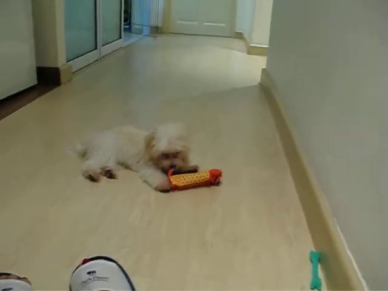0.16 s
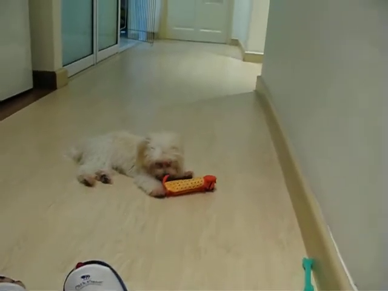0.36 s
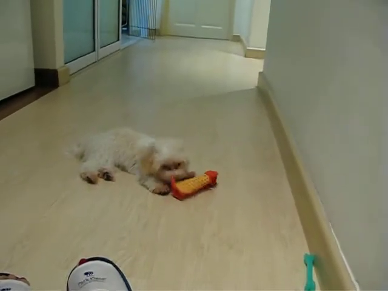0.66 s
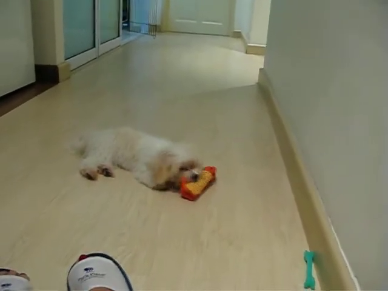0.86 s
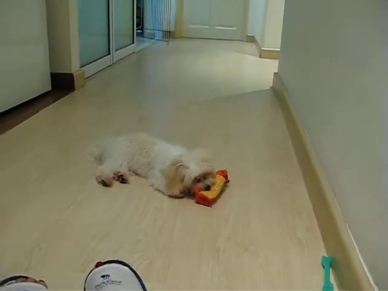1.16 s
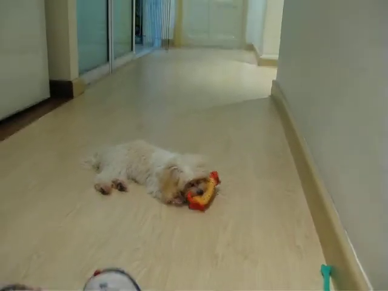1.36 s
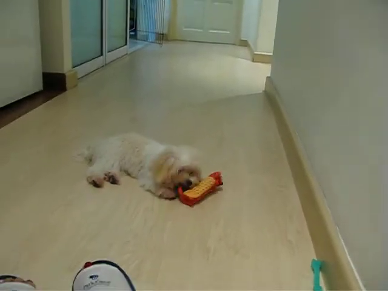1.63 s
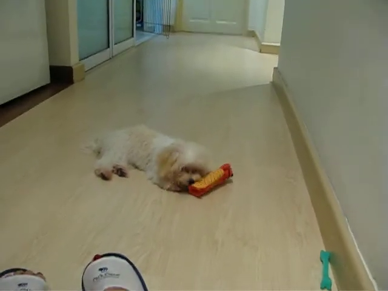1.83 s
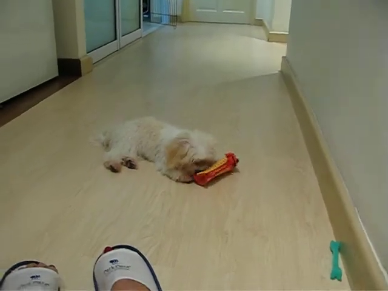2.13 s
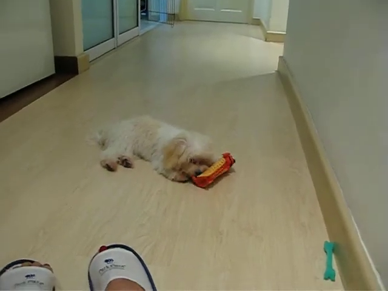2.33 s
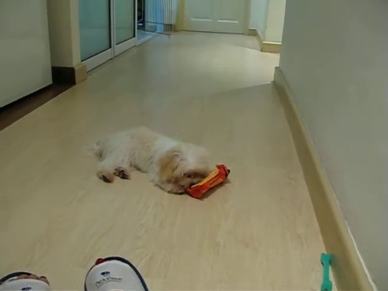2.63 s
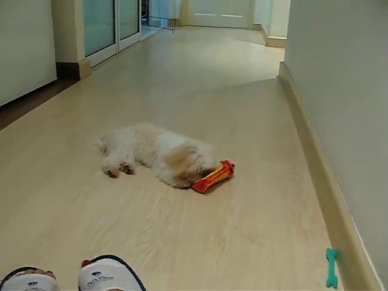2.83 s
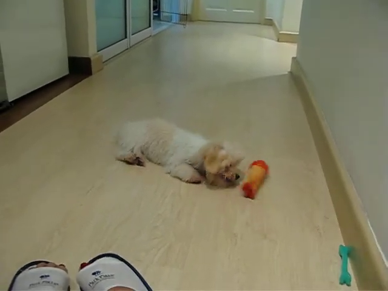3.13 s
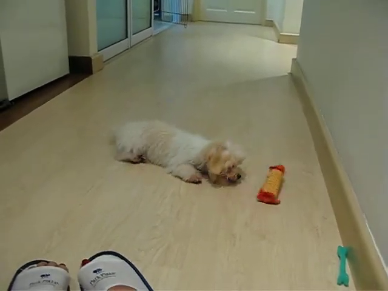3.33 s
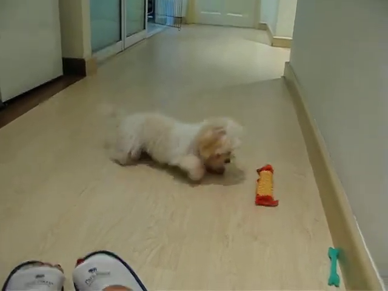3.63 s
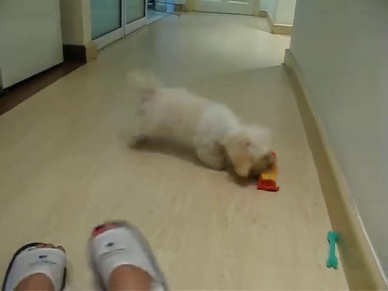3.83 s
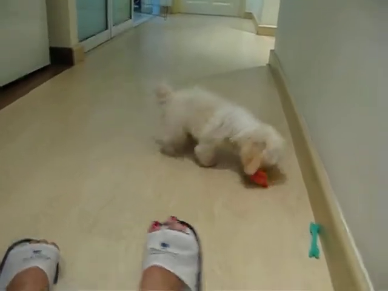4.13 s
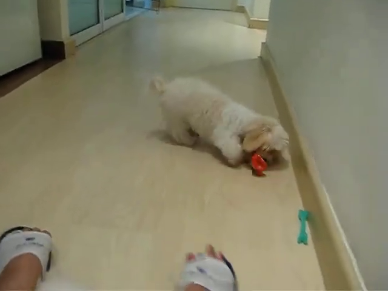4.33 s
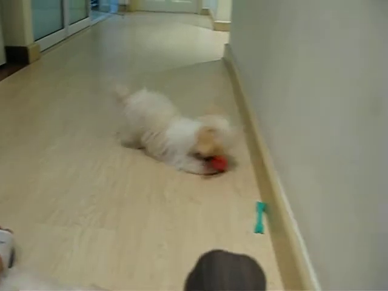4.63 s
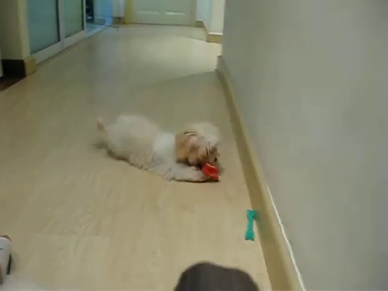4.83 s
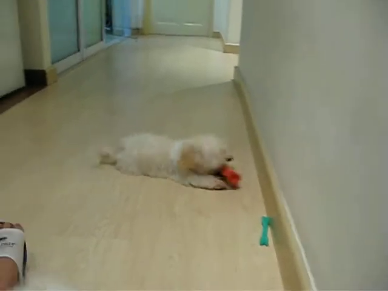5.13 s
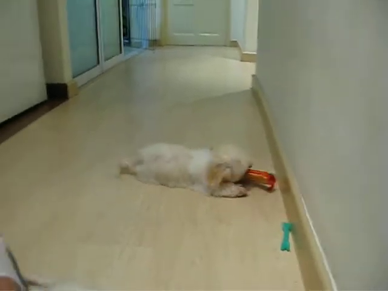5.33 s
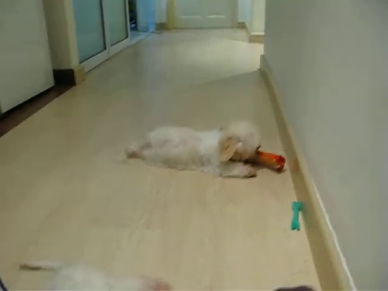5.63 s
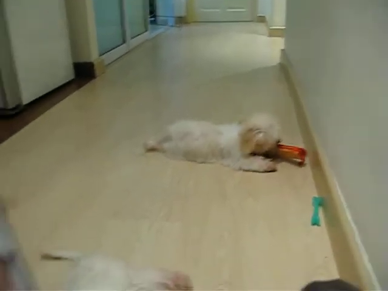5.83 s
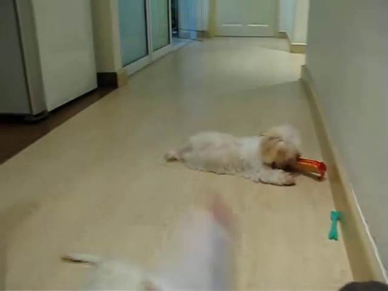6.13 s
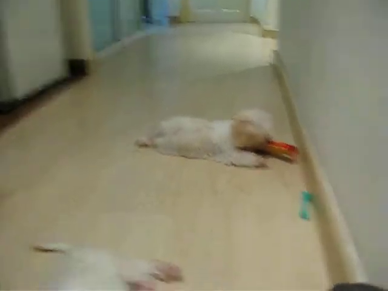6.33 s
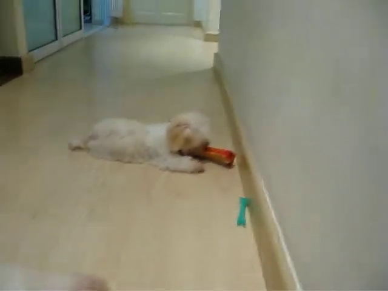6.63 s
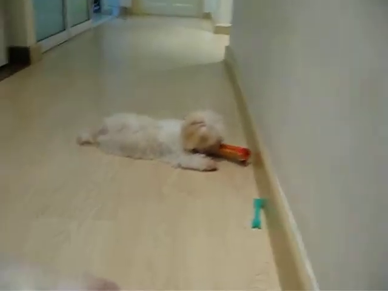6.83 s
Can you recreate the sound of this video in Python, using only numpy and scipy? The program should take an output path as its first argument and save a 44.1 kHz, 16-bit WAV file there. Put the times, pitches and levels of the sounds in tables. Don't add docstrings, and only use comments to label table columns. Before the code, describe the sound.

Soft room hush and faint appliance hum fill a bare, hard-floored hallway. Claws tick at 0.1-0.2 s, and a rubber toy bumps dully around 0.7-0.85 s. A small air hiss leads into a shrill, buzzy squeak from 0.94 to 1.17 s, its pitch rising slightly then sagging, with an echoing tail. From 2 to 3.8 s there are light fur scuffs, bright ticks and hollow bumps. Air hisses, then the strongest squeak arches up and collapses at 3.9-4.3 s. A hollow bump and a very short, weaker squeak at 4.4 s follow, then breath, knocks at 4.6-4.7 s and a wavering squeak until 5.05 s. A sharp nasal snort bursts at 5.2 s; the toy settles softly by 5.5 s. Close cloth rustles; clicks and slipper drags come at 6.1 and 6.5 s, with a sweeping fabric hiss to the end. The loud squeaks overload the microphone.

```python
import sys
import numpy as np
from scipy import signal
from scipy.fft import rfft, irfft
from scipy.io import wavfile
from scipy.ndimage import uniform_filter1d

SR = 44100
rng = np.random.default_rng(int(sys.argv[2]) if len(sys.argv) > 2 else 0)


def put_to_file(sound):
    columns = np.atleast_2d(sound).T
    safe = np.clip(columns, -1, 1)
    whole_steps = np.round(safe * 32767)
    wavfile.write(sys.argv[1], SR, whole_steps.astype(np.int16))


def gain_from_db(level_db):
    decades = np.asarray(level_db, float) / 20
    return 10 ** decades


N = 307818


def noise_like(t):
    return rng.standard_normal(len(t))


def rms_one(x):
    return x / np.sqrt(np.mean(x ** 2) + 1e-20)


def band(x, hz, octaves):
    edges = np.clip(hz * 2.0 ** (np.array([-.5, .5]) * octaves), 15, 20000)
    return signal.sosfilt(signal.butter(2, edges, "band", fs=SR, output="sos"), x)


def ring(x, hz, width_hz):
    r, w = np.exp(-np.pi * width_hz / SR), 2 * np.pi * hz / SR
    return signal.lfilter([0, np.sin(w)], [1, -2 * r * np.cos(w), r * r], x)


def add(out, x, s):
    i = round(s * SR)
    out[i:i + len(x)] += x[:N - i]


# frequency in Hz, level in dB per Hz.
STILL_AIR = [(12, -49), (20, -9), (127, -9.5), (204, -18.5), (270, -18.5), (347, -17), (388, -12.5),
             (485, -14), (527, -13), (802, -15), (1030, -16.5), (1120, -15.5), (2670, -21.5), (4300, -22.5),
             (16000, -37.5)]
# frequency in Hz, width in Hz, level in dB.
APPLIANCE_HUMS = [(293, 60, -56.5), (797, 160, -59.5), (1025, 90, -64), (4480, 94, -67.5)]


def house():
    f = np.arange(N // 2 + 1) * SR / N + 1
    hz, db = np.transpose(STILL_AIR)
    air = irfft(rfft(rng.standard_normal(N)) * gain_from_db(np.interp(np.log(f), np.log(hz), db)), N)
    hums = sum(gain_from_db(db) * rms_one(ring(rng.standard_normal(N), hz, width)) for hz, width, db in APPLIANCE_HUMS)
    return gain_from_db(-52.5) * rms_one(air) + hums


# time in seconds, level in dB.
RUSTLE_LEVEL = [(0, -74.5), (1.9, -70.5), (2.5, -69), (3.0, -78), (3.5, -64), (3.9, -54), (5.4, -56.5),
                (5.8, -55), (6.4, -54), (7, -53.5)]


def rustle():
    s, db = np.transpose(RUSTLE_LEVEL)
    cloth = rms_one(band(rng.standard_normal(N), 2500, 5))
    return cloth * gain_from_db(np.interp(np.arange(N) / SR, s, db))


# frequency in Hz, time to fade by 60 dB in seconds.
HALL_FADE = [(250, 0.67), (1000, 0.77), (3000, 0.74), (6000, 0.75), (9000, 0.51), (12000, 0.56),
             (15000, .4)]


def hallway(x):
    hall_db, gap_s = -1.5, 0.006
    tilt_db_per_octave = -3
    near_walls_db, near_walls_t60_s = 7.5, 0.26
    t, tail = np.arange(SR) / SR, 0
    noise = rng.standard_normal((2, SR))
    hz, t60 = np.transpose(HALL_FADE)
    for k, centre in enumerate(125 * 2 ** np.arange(0, 7.3, .5)):
        decay = np.interp(np.log(centre), np.log(hz), t60)
        tilt_db = tilt_db_per_octave * min(np.log2(centre / 8000), 0)
        tail = tail + band(noise[k % 2], centre, .5) * gain_from_db(tilt_db - 60 * t / decay)
    tail = tail * (1 + gain_from_db(near_walls_db - 60 * t / near_walls_t60_s))
    tail = tail * np.clip(t / gap_s, 0, 1) ** 2
    tail = gain_from_db(hall_db) * tail / np.sqrt(np.sum(tail ** 2))
    return signal.fftconvolve(x, tail)[:N]


def puffs(events, colour):
    out, t = np.zeros(N), np.arange(SR) / SR
    for s, rise, hold, db in events:
        fall_s = 0.024 + 0.6 * hold
        shape = np.clip(t / rise, 0, 1) ** 2 * np.exp(-np.maximum(t - rise - hold, 0) / fall_s)
        roughness_db = 1.9 * rms_one(band(noise_like(t), 110, 2.5))
        grain = noise_like(t) * gain_from_db(roughness_db)
        noise = 0
        for hz, octaves, part_db in colour:
            part = band(band(grain, hz, octaves), hz, 1.5 * octaves)
            noise = noise + gain_from_db(part_db) * rms_one(part)
        add(out, gain_from_db(db) * shape * noise, s)
    return out


# start, rise and hold in seconds, level in dB.
SLIDE_TIMES = [
    (6.094, 0.0036, 0.1, -49),
    (6.594, 0.021, 0.35, -61.5),
]
# frequency in Hz, width in octaves, level in dB.
SLIDE_COLOUR = [(2870, 0.96, -0.8), (2180, 0.086, -10), (1320, 0.43, -7)]
# start, rise and hold in seconds, level in dB.
SHUFFLE_TIMES = [
    (.166, 0.018, 0.022, -57),
    (4.696, 0.0042, .004, -37.5),
    (6.486, .002, 0.11, -49.5),
    (6.65, .039, .36, -55.5),
]
# frequency in Hz, width in octaves, level in dB.
SHUFFLE_COLOUR = [(3030, 2.3, 0.19)]
# start, rise and hold in seconds, level in dB.
SWEEP_TIMES = [
    (6.46, 0.084, 0.05, -50.5),
]
# frequency in Hz, width in octaves, level in dB.
SWEEP_COLOUR = [(10400, 1, 0.1), (4300, 0.22, -7)]


def person():
    slipper = puffs(SLIDE_TIMES, SLIDE_COLOUR)
    legs = puffs(SHUFFLE_TIMES, SHUFFLE_COLOUR)
    return slipper + legs + puffs(SWEEP_TIMES, SWEEP_COLOUR)


# start, rise and hold in seconds, level in dB.
SCUFF_TIMES = [(1.998, .02, 0.048, -54.5), (2.409, .006, 0.03, -59.5), (2.612, .002, 0.072, -55),
               (2.745, .1, 0.067, -58.5), (3.525, .004, .04, -63), (3.611, .037, 0.028, -54.5),
               (3.766, .02, 0.019, -58)]
# frequency in Hz, width in octaves, level in dB.
SCUFF_COLOUR = [(3700, 0.32, -3), (5060, 0.31, -2), (7200, 0.29, -5)]
# start, rise and hold in seconds, level in dB.
SWISH_TIMES = [
    (.747, .001, .003, -59),
    (2.006, 0.026, 0.12, -62.5),
    (2.535, .005, 0.336, -65),
    (3.6, .009, .052, -56),
]
# frequency in Hz, width in octaves, level in dB.
SWISH_COLOUR = [(12300, 0.41, 0.14)]


def fur():
    return puffs(SCUFF_TIMES, SCUFF_COLOUR) + puffs(SWISH_TIMES, SWISH_COLOUR)


# start, rise and hold in seconds, level in dB.
SNORT_TIMES = [
    (4.446, 0.023, 0.17, -52.5),
    (5.177, 0.0027, 0.0084, -36.5),
    (5.178, 0.0085, .1, -39.5),
    (5.4, .038, 0.075, -53.5),
]
# frequency in Hz, width in octaves, level in dB.
SNORT_COLOUR = [(4560, 0.4, -2.5), (3520, 0.42, -1.5), (2480, .4, -4), (1000, 1.65, -12)]


def snorts():
    return puffs(SNORT_TIMES, SNORT_COLOUR)


# start, rise and hold in seconds, level in dB.
LEAK_TIMES = [
    (.324, 0.015, 0.015, -64.5),
    (.48, .003, 0.0032, -59.5),
    (.86, .06, .015, -46.5),
    (3.84, 0.12, .011, -36),
    (4.58, 0.02, 0.059, -44),
    (5.478, 0.014, .048, -57.5),
]
# frequency in Hz, width in octaves, level in dB.
LEAK_COLOUR = [(8800, 1.4, 0.1)]
# start, rise and hold in seconds, level in dB.
SLUMP_TIMES = [
    (4.255, 0.0077, 0.003, -47),
]
# frequency in Hz, width in octaves, level in dB.
SLUMP_COLOUR = [(660, .76, 0.11)]


def toy_air():
    return puffs(LEAK_TIMES, LEAK_COLOUR) + puffs(SLUMP_TIMES, SLUMP_COLOUR)


def knocks(events, t60_s, contact_s, overtone, overtone_db):
    out, t = np.zeros(N), np.arange(8000) / SR
    width_hz = 4.0 / max(t60_s, .001)
    for s, peak_db, hz in events:
        touch = (1 + 0.23 * noise_like(t)) * np.exp(-t / contact_s)
        body = ring(touch, hz, width_hz)
        higher = ring(touch, min(overtone * hz, 18000), 2 * width_hz)
        x = body + gain_from_db(overtone_db) * higher
        add(out, gain_from_db(peak_db) * x / abs(x).max(), s)
    return out


# time in seconds, peak level in dB, frequency in Hz.
TICK_TIMES = [(0.1027, -31, 3240), (0.1908, -27.5, 1690), (0.2194, -42, 2810), (0.8425, -36, 1840),
              (2.1335, -31.5, 3200), (2.149, -33, 1845), (2.422, -38.5, 3750), (2.5371, -29.5, 7000),
              (2.875, -38, 9000), (2.6135, -27, 4830), (3.2904, -37, 4340), (3.3149, -34.5, 3500),
              (3.6152, -26, 7100), (3.629, -40, 8000), (3.7928, -31.5, 4760), (3.8094, -40, 3450),
              (5.9001, -34, 1710), (6.1, -21.5, 2740), (6.4884, -23.5, 3020)]


def ticks():
    x = knocks(TICK_TIMES, t60_s=0.0058, contact_s=.0001, overtone=1.7, overtone_db=-6)
    return band(x, 4000, 3)


# time in seconds, peak level in dB, body frequency in Hz.
BUMP_TIMES = [(0.693, -36.5, 560), (0.725, -32.5, 598), (0.841, -34, 590), (0.859, -36.5, 403),
              (2.379, -44, 532), (3.028, -34, 790), (3.04, -27, 773), (3.051, -32, 880), (3.105, -36, 538),
              (3.112, -31.5, 515), (3.312, -29.5, 617), (3.762, -42, 520), (3.865, -33.5, 530),
              (4.272, -21.5, 650), (4.627, -23.5, 535), (4.698, -18.5, 630), (5.247, -32, 293),
              (5.494, -39.5, 248)]


def bumps():
    x = knocks(BUMP_TIMES, t60_s=.05, contact_s=0.00021, overtone=1.43, overtone_db=-2.5)
    return band(x, 770, 5.1)


def squeak(bite, strength, colour, stall):
    wobble, thinning_db, onset_s, breath_db = 0.00076, 6.0, 0.00098, -33
    db_per_semitone = 6
    level_db, brighter_db = strength
    stall_s, pitch_lost, fade_db = stall
    s, hz = np.transpose(bite)
    t = np.arange(s[0], s[-1] + stall_s, 1 / SR)
    progress = (t - s[0]) / (s[-1] - s[0])
    dying = np.clip((t - s[-1]) / stall_s, 0, 1) ** 2

    unsteady = rms_one(band(noise_like(t), 60, 5.0))
    glide = uniform_filter1d(np.interp(t, s, hz), size=500, mode="nearest")
    pitch = glide * (1 - pitch_lost * dying) * (1 + wobble * unsteady)
    phase = 2 * np.pi * np.cumsum(pitch) / SR

    multiple, colour_db = np.transpose(colour)
    multiple, colour_db = [*multiple, multiple[-1] + 1], [*colour_db, -60]
    tone = 0
    for k in range(1, 16):
        octaves = np.log2(k / 7)
        gain_db = np.interp(k * pitch / hz.mean(), multiple, colour_db)
        gain_db = gain_db + brighter_db * progress * octaves - thinning_db * dying * abs(octaves)
        shimmer_db = 3.0 if 2 < k < 6 else 1.3
        gain_db = gain_db + shimmer_db * rms_one(band(noise_like(t), 30, 3.0))
        tone = tone + gain_from_db(gain_db) * np.cos(k * phase + k * k * 0.2855)

    breath = rms_one(band(noise_like(t), 2800, 2.25)) * (1 + np.cos(phase))
    semitones = 12 * np.log2(glide / hz.mean())
    pressure = gain_from_db(level_db + db_per_semitone * semitones + fade_db * dying)
    edges = np.clip(np.minimum(t - t[0], t[-1] - t) / onset_s, 0, 1)
    return (rms_one(tone) + gain_from_db(breath_db) * breath) * pressure * edges


# time in seconds, pitch in Hz.
PITCH_1 = [(0.94, 1110), (0.992, 1117), (1.09, 1156), (1.128, 1147), (1.15, 1133)]
PITCH_2 = [(3.912, 1107), (4.008, 1147), (4.062, 1186), (4.072, 1180), (4.108, 1207), (4.144, 1177),
           (4.158, 1157), (4.214, 1123), (4.249, 1077)]
PITCH_3 = [(4.377, 1217), (4.408, 1200), (4.44, 1205)]
PITCH_4 = [(4.716, 1224), (4.746, 1207), (4.798, 1268), (4.86, 1276), (4.918, 1229), (5.01, 1200),
           (5.047, 1159)]
# multiple of the mean pitch, level in dB.
JAWS_1 = [(1, -23.5), (2, -21), (3, -18), (4, -16.5), (5, -12), (6, -5), (7, 2), (8, 3), (9, -0.5),
          (10, -9.5), (11, -11.5), (12, -25.5), (13, -27.5), (14, -30.5)]
JAWS_2 = [(1, -15), (2, -18.5), (3, -23), (4, -12.5), (5, -9), (6, -2.5), (7, 1.5), (8, 2), (9, -3.5),
          (10, -16.5), (11, -9), (12, -27), (13, -23), (14, -36)]
JAWS_3 = [(1, -19), (2, -23.5), (3, -27), (4, -29.5), (5, -21.5), (6, -37.5), (7, -13.5), (8, -6.5),
          (9, -14), (10, -12.5), (11, -13), (12, -14.5), (13, -38)]
JAWS_4 = [(1, -9.5), (2, -9.5), (3, -17), (4, -13.5), (5, -9.5), (6, -11), (7, 2.5), (8, 6.5), (9, 2.5),
          (10, -5), (11, -3.5), (12, -26), (13, -21)]
# level at mean pitch in dB, brightening from start to end in dB per octave.
BITE_STRENGTH = [
    (-1.5, -1.5),
    (1.5, 2.6),
    (-12, 0.4),
    (-10, 1.6),
]
# length in seconds, share of pitch lost, fade in dB.
REED_STALLS = [
    (0.024, 0.1177, -8),
    (0.045, 0.25, -45),
    (0.014, .08, -3),
    (0.015, 0.15, -7),
]
# gain in dB, one per squeak.
TOWARD_MIC = [5.5, -0.1, 1.5, 2.5]


def toy():
    out = np.zeros(N)
    pitches = PITCH_1, PITCH_2, PITCH_3, PITCH_4
    colours = JAWS_1, JAWS_2, JAWS_3, JAWS_4
    for bite, strength, colour, stall in zip(pitches, BITE_STRENGTH, colours, REED_STALLS):
        add(out, squeak(bite, strength, colour, stall), bite[0][0])
    starts = [round(bite[0][0] * SR) for bite in pitches]
    latest = np.searchsorted(starts, np.arange(N), side="right") - 1
    return out, out * gain_from_db(TOWARD_MIC)[latest]


def scene():
    small = person() + fur() + snorts() + toy_air()
    tick, bump = ticks(), bumps()
    squeaks, aimed = toy()
    direct = aimed + bump + 0.9 * tick + small
    echoes = hallway(squeaks + 0.5 * bump + tick + small)
    return (direct + echoes + house() + rustle())[None]


def band_limit(x):
    return signal.sosfilt(signal.butter(12, 16990, fs=SR, output="sos"), x)


def record(dry):
    ceiling, knee, lopsided, cutoff_hz = 0.42, 2.5, .1, 15850
    fine = signal.resample_poly(dry, 3, 1, axis=1)
    squeezed = fine / (1 + abs(fine / ceiling) ** knee) ** (1 / knee)
    squeezed = squeezed + lopsided * squeezed ** 2
    mix = signal.resample_poly(squeezed, 1, 3, axis=1)
    mix = signal.sosfilt(signal.butter(1, 15, "high", fs=SR, output="sos"), mix)
    mix = signal.sosfilt(signal.ellip(10, .5, 60, cutoff_hz, fs=SR, output="sos"), mix)
    return band_limit(mix)


dry = scene()
out = record(dry)
put_to_file(out)
```